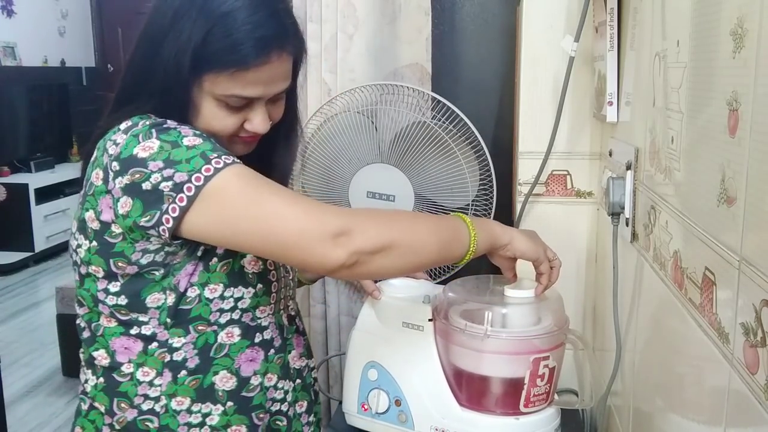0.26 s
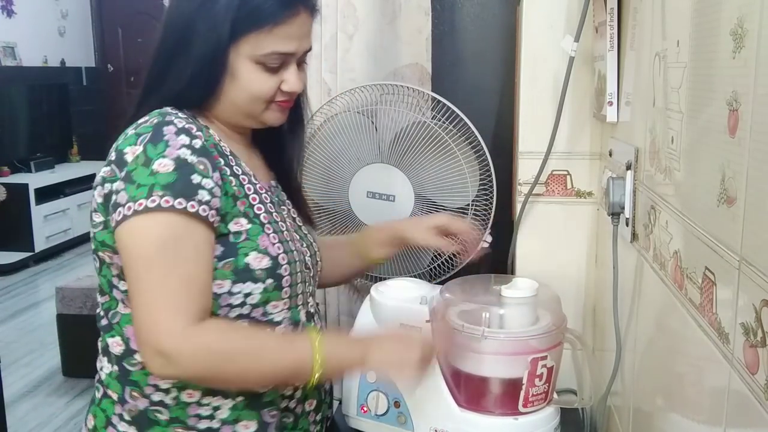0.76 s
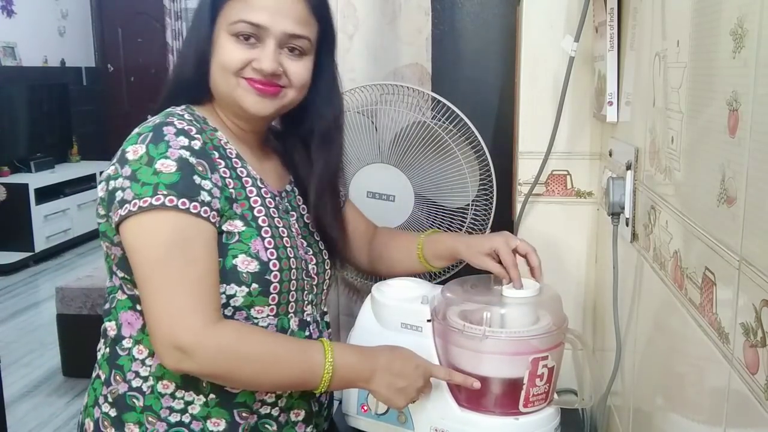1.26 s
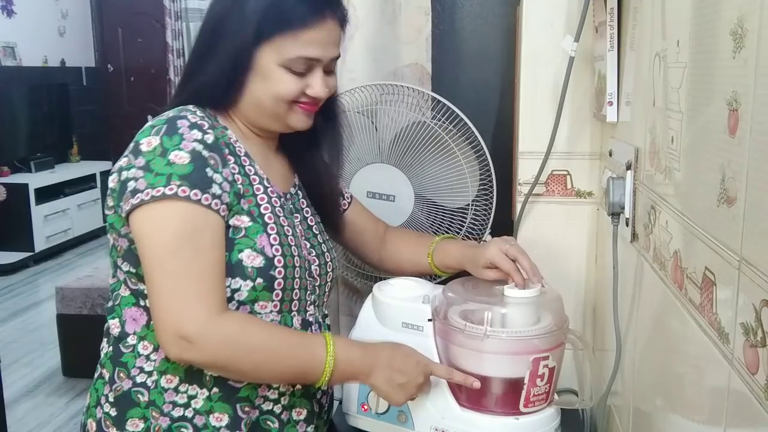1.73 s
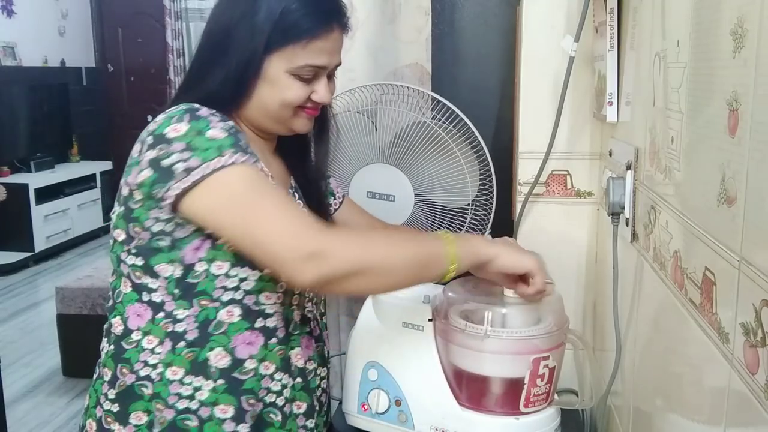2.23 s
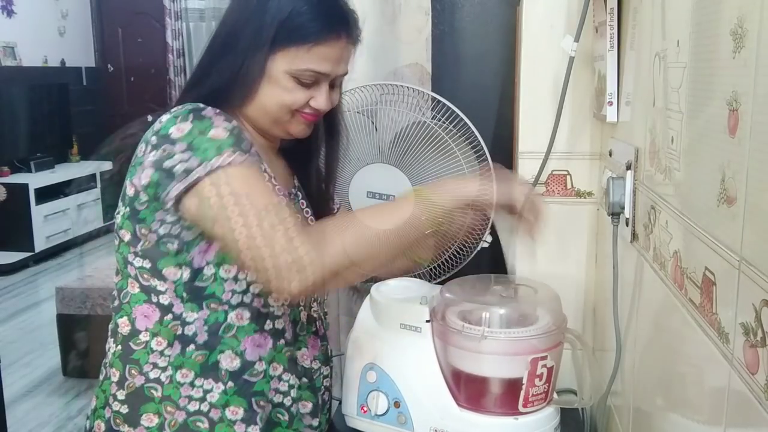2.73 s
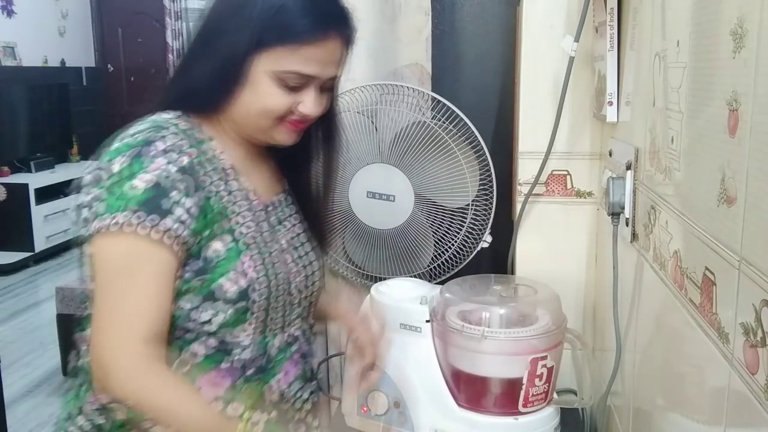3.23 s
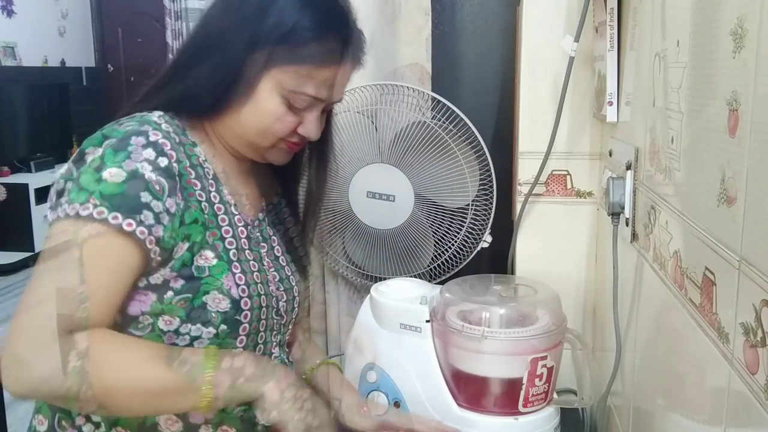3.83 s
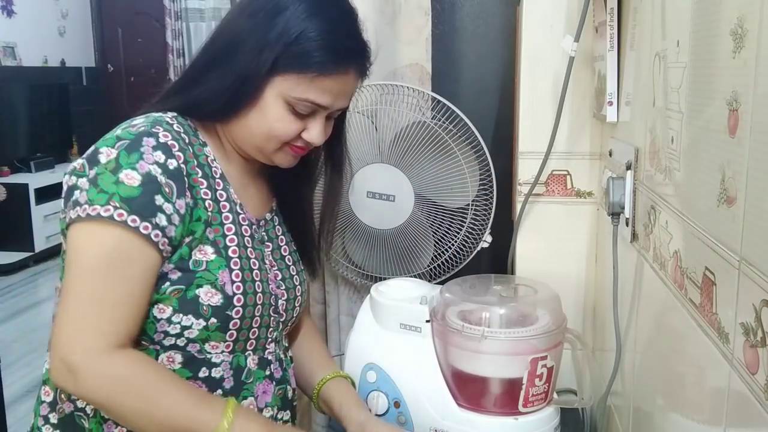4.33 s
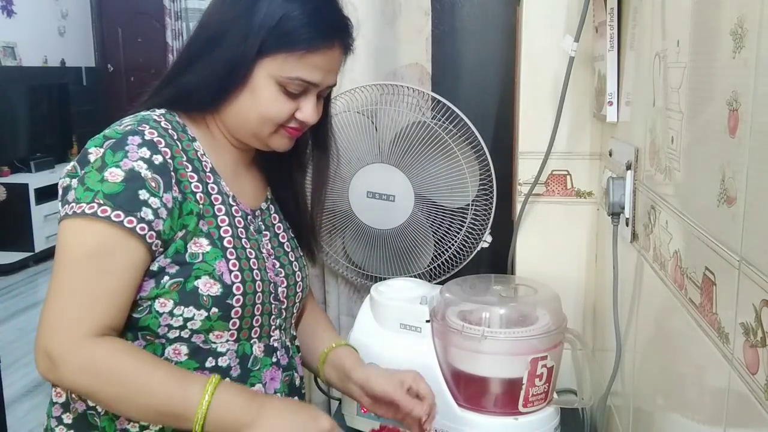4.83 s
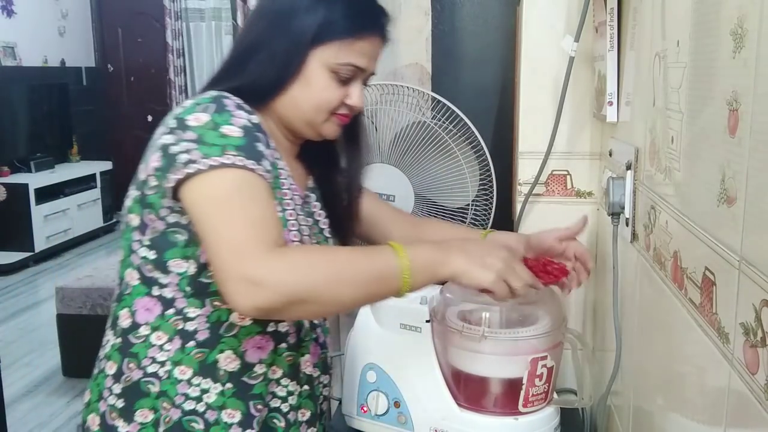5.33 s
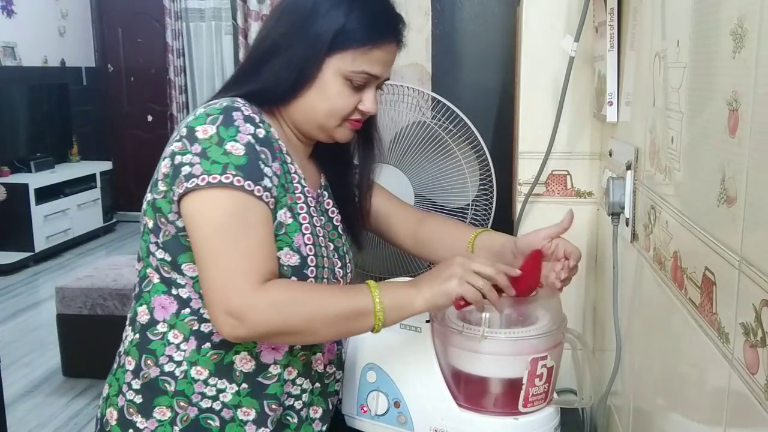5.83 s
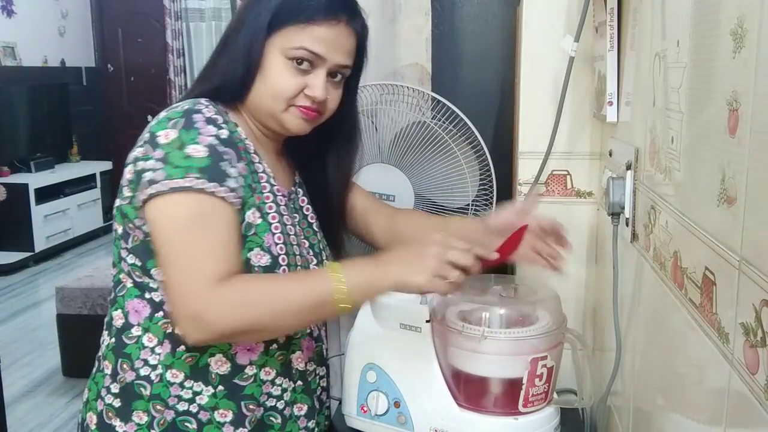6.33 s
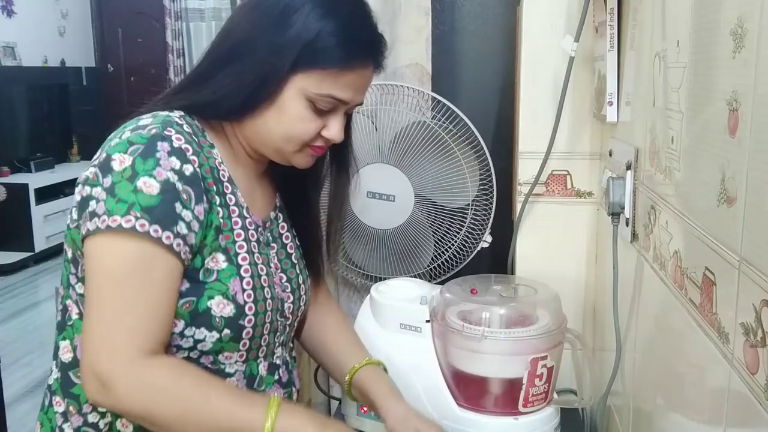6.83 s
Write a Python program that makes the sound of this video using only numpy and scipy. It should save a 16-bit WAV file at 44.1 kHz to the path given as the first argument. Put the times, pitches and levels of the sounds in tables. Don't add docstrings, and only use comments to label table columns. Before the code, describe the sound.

A juicer motor, already switched off, coasts down from 0 to about 1.15 s: a rough gear whine with airy, rattling noise falls steadily in pitch and stops. A light lid contact lands at 1.1 s, then soft ticks and brushes until 2.5 s over low house hum, while a faint hoarse bird whistles outside from 1.4 to 3.4 s. Firm thumps and a hard rap come at 2.65-2.75 s, then a palm slide near 3.1 s. At 3.4 s the background cuts to a quieter one with a bright clink. At 3.57 s hard plastic drops with a very loud chattering crack, landing again softly at 3.75 s. Clinks at 4.25 s, a set-down at 4.54 s, small parts rattling at 4.7-4.85 s. A faint metallic touch at 5.4 s, a knock, then a spatula scrape 5.6-6.05 s, three bowl taps 6.18-6.34 s, a knock at 6.6 s and two clacks at 6.9 s.

```python
import sys
import numpy as np
from scipy import signal
from scipy.fft import rfft, irfft, next_fast_len
from scipy.io import wavfile
from scipy.ndimage import uniform_filter1d, map_coordinates

SR = 44100
rng = np.random.default_rng(int(sys.argv[2]) if len(sys.argv) > 2 else 0)


def elevation(decibels):
    levels = np.asarray(decibels, float)
    return 10 ** (levels / 20)


def generate_wav(sig):
    pcm = np.round(np.clip(np.atleast_2d(sig).T, -1, 1) * 32767).astype(np.int16)
    wavfile.write(sys.argv[1], SR, pcm)


N = 311346
TIME = np.arange(N) / SR
CHANGE_S = 3.408
HALVES = np.array([[.5], [-.5]])


def unit(x):
    return x / np.sqrt(np.mean(x ** 2) + 1e-20)


def along(points, hz):
    f, v = np.transpose(points)
    return np.interp(np.log(hz + 1), np.log(f + 1), v)


def curves(rows):
    s, *columns = np.transpose(rows)
    return [np.interp(TIME, s, column) for column in columns]


def during(start, end, fade):
    return np.clip(np.minimum(TIME - start, end - TIME) / fade + .5, 0, 1)


def wobble(rate):
    knots = rng.standard_normal(int(N * rate / SR) + 4)
    return map_coordinates(knots, [TIME * rate])


def filtered(x, response):
    m = next_fast_len(N + SR // 2)
    return irfft(rfft(x, m) * response(np.fft.rfftfreq(m, 1 / SR)), m)[..., :N]


def resonances(modes, f):
    total = 0
    for k, (centre, width, db) in enumerate(modes):
        damping = 1j * f * width
        total = total + (-1) ** k * elevation(db) * damping / (centre * centre - f * f + damping)
    return total


# f/Hz, left-right likeness
LIKENESS = [(60, .995), (130, .995), (290, .94), (640, .55), (1410, .2), (3100, .05), (15000, 0)]


def rush(gain):
    def mid_side(hz):
        turn = np.arccos(np.clip(along(LIKENESS, hz), -1, 1)) / 2
        return gain(hz) * [np.cos(turn), np.sin(turn)]
    mid, side = filtered(rng.standard_normal((2, N)), mid_side)
    return unit(np.array([mid + side, mid - side]))


def shaped(spectrum):
    return rush(lambda hz: elevation(along(spectrum, hz)))


def glide(rows, blur, spread, rate):
    hz, db = curves(rows)
    turn = 2 * np.pi * np.cumsum(hz) / SR + blur * np.minimum(hz / 1000, 1) * wobble(rate)
    gate = during(rows[0][0], rows[-1][0], 0.025)
    return np.sqrt(2) * elevation(db) * gate * np.sin(turn + spread * np.array([wobble(25), wobble(19)]))


def echoed(x, wet_db, t60):
    t = np.arange(SR // 2) / SR
    tail = elevation(-60 * t / t60) * rng.standard_normal((2, len(t)))
    tail = tail / np.linalg.norm(tail[0])
    return x + elevation(wet_db) * signal.fftconvolve(x, tail, axes=1)[:, :N]


def contacts(rows, body, t60, pan_db, broad_db, crack_db, rise, hold, top_hz=5500, blow=9):
    t = np.arange(SR // 2) / SR
    drive = np.zeros((3, 2, N + len(t)))
    fade_db = -60 * t / max(t60, .03) - 3 * (t / hold) ** 3
    shape = elevation(crack_db - 60 * t / 0.011) + (1 - np.exp(-t / rise)) * elevation(fade_db)
    for s, db, thud_db, fizz_db in rows:
        walls = shape * rng.standard_normal((3, len(t)))
        walls[0, 0] = blow * elevation(crack_db)
        for k, (level, alike) in enumerate([(thud_db, .98), (0, .25), (fizz_db, 0)]):
            pair = np.sqrt(alike) * walls[0] + np.sqrt(1 - alike) * walls[1:]
            drive[k, :, round(s * SR):][:, :len(t)] += elevation(db + level + HALVES * pan_db) * pair

    def low(f, hz):
        return 1 / (1 + 1j * f / hz) ** 2

    def high(f, hz):
        return (1j * f / hz) ** 2 * low(f, hz)

    bands = [lambda f: high(f, 170) ** 2 * low(f, 1200),
             lambda f: high(f, 800) * low(f, top_hz) ** 2,
             lambda f: high(f, 3500) ** 2 * low(f, 14000)]
    grid = np.linspace(1, 15500, num=4000)
    sound = 0
    for part, band in zip(drive, bands):
        colour = lambda f: band(f) * (resonances(body, f) + elevation(broad_db))
        power = np.mean(abs(colour(grid)) ** 2) * 2 * grid[-1] / SR
        sound = sound + filtered(part[:, :N], colour) / np.sqrt(power)
    return sound


def same(rows, thud_db, fizz_db):
    return [(s, db, thud_db, fizz_db) for s, db in rows]


MESH_HZ, STOP_S = 1280, 1.15


def coasting(t):
    return np.clip(1 - (1140 - 115 * np.minimum(t, 2)) * t / MESH_HZ, .05, 1)


RUN = np.linspace(0, STOP_S - .09, num=300)
MESH = coasting(RUN) * MESH_HZ

# f/Hz, width/Hz, level/dB
HOUSING_MODES = [(292.2, 15, 4), (383.8, 8.5, 7.5), (202.7, 41, -12.5), (506, 24, -7.5)]
# f/Hz, width/Hz, level/dB
BEARING_MODES = [(2430, 87, 3.5), (2400, 530, -6), (7190, 350, -12.5)]
# f/Hz, level/dB per Hz
RATTLE_SPECTRUM = [(59, -49.5), (100, -23), (369, -5), (569, -21), (682, -13), (816, -15), (906, -24.5),
                   (1010, -19.5), (1830, -17.5), (2440, -16), (3600, -24.5), (4680, -91), (7920, -120)]
# f/Hz, level/dB per Hz
AIR_SPECTRUM = [(1650, -15.5), (2800, -15), (3740, -3), (4820, -2), (5650, -4), (6210, -3.5), (9800, -6),
                (11200, -2), (14800, -14), (15800, -50)]
# level/dB at the start, power of speed
NOISE_LAYERS = [
    (-29, 0.21),
    (-22.5, 1.08),
    (-41.5, 0.025),
    (-27, 1.48),
]


def running_noise():
    speed_db = 20 * np.log10(coasting(TIME))
    housing_db, rattle_db, squeal_db, air_db = [db + power * speed_db for db, power in NOISE_LAYERS]
    shake = elevation(2 * wobble(16) + 1.5 * wobble(40))
    drum = rush(lambda f: resonances(HOUSING_MODES, f) * f ** 2 / (f ** 2 + 150 ** 2))
    drum = elevation(housing_db) * shake * drum
    rub = elevation(squeal_db + 1.5 + 1.4 * wobble(44)) * rush(lambda f: resonances(BEARING_MODES, f))
    rattle = elevation(rattle_db - 4 + 1.8 * wobble(50)) * shaped(RATTLE_SPECTRUM)
    air = elevation(air_db + 1.0 * wobble(34)) * shaped(AIR_SPECTRUM)
    return during(-1, STOP_S, 0.24) ** 1.5 * (drum + rub + rattle + air)


# f/Hz, width/Hz, level/dB
PANEL_MODES = [(1223, 90, 13), (1099.5, 22, 26.5), (937, 130, 15), (802, 43, 19), (706, 74, 11),
               (544, 35, 14), (512.6, 79, 19.5), (353, 43, 17.4), (297, 87, 15), (226.8, 37, 13)]


def gear_whine():
    uneven = elevation(2.5 * wobble(150) + 2 * wobble(30))
    whine = np.transpose([RUN, MESH, -45.5 + 0 * RUN])
    whine = uneven * glide(whine, blur=1.0, spread=0.25, rate=150)

    def panels(f):
        return sum(resonances([panel], f) ** 2 / elevation(panel[2]) for panel in PANEL_MODES) + 1.6
    return filtered(whine, panels)


# multiple of the mesh, level/dB
UNBALANCED = [(.28, -29), (.41, -34.5), (.64, -37.5)]


def shaft_shake():
    slow = 0
    for k, db in UNBALANCED:
        tone = glide(np.transpose([RUN, k * MESH, db + 0 * RUN]), blur=1.7, spread=0.063, rate=44)
        slow = slow + elevation(3.0 * wobble(13.38)) * tone
    return filtered(slow, lambda f: resonances(HOUSING_MODES, f))


def cooling_blades():
    fan = 1.73 * MESH
    choked = np.transpose([RUN, fan, -29 - 0.17 * np.maximum(1464 - fan, 0)])
    return elevation(-7.5 + 2 * wobble(25)) * glide(choked, blur=1.2, spread=0.7, rate=120)


# multiple of the mesh, level/dB at the start
SHAFT_ORDERS = [(.66, -43.5), (.83, -43), (1.17, -40), (1.36, -43), (1.548, -44), (2.0, -42), (2.3, -45),
                (3.5, -47)]


def shaft_rasp():
    rasp = 0
    for k, db in SHAFT_ORDERS:
        falling = np.transpose([RUN, k * MESH, db + 30 * np.log10(MESH / MESH_HZ)])
        rasp = rasp + elevation(1.6 * wobble(40)) * glide(falling, blur=1.25, spread=0.94, rate=120)
    return rasp


# f/Hz, left over right level/dB
JUICER_BALANCE = [(60, 1.5), (110, 1.5), (200, -1.5), (380, -2.5), (700, 3), (1290, 0), (2380, -0.5),
                  (4400, 1.5), (8120, -1), (15000, 5.5)]


def motor():
    tones = gear_whine() + shaft_shake() + cooling_blades() + shaft_rasp()
    whole = running_noise() + echoed(tones, wet_db=-10.0, t60=0.2)
    return filtered(whole, lambda f: elevation(along(JUICER_BALANCE, f) * HALVES))


# quiet level/dB, gain/dB when the suppression opens
HOUSE_LEVELS = [
    [(-57, 5), (-62.5, -24.5), (-61, 6.5)],
    [(-76, 13), (-70, 5), (-92, 22.5)],
]
# f/Hz, level/dB per Hz
HUM_SPECTRA = [
    [(12, -55.5), (20, -23.5), (145, 2.5), (241, -3.5), (362, 1), (441, -13.5), (653, -6.5), (1000, -22), (1300, -34), (2200, -120)],
    [(12, -60), (20, -26.5), (147, -12), (345, -1), (487, -12.5), (622, -5), (1000, -41), (1300, -54), (2200, -120)],
]
# f/Hz, level/dB per Hz
MURMUR_SPECTRA = [
    [(470, 5.5), (800, 3), (2110, 0.5), (2870, -56), (3230, -32.5), (3420, -25), (4040, -31.5), (4500, -46), (5850, -93.5), (9900, -120)],
    [(470, -45.5), (800, -5.5), (1020, -30.5), (1050, -20.5), (1360, -6), (1610, -12), (2220, -19.5), (2600, -12.5), (2920, -23), (4500, -47), (5850, -63.5), (9900, -120)],
]
# f/Hz, level/dB per Hz
HISS_SPECTRA = [
    [(2350, -35), (4000, 3.5), (4810, -16), (5650, -10), (6120, -6), (7310, -1), (11900, 14.5), (15800, -11)],
    [(2350, -68), (4000, -38.5), (4460, -3.5), (5030, -5), (6830, -7), (15800, 6)],
]
# f/Hz, level/dB
ELECTRIC_TONES = [
    (3150, -74),
    (6300, -84),
]


def room(busy):
    opens_db, open_db, release_s = -53.5, -33, 0.27
    keep = np.exp(-1 / (release_s * SR / 4))
    heard = signal.lfilter([1 - keep], [1, -keep], np.mean(busy ** 2, axis=0))
    heard_db = 10 * np.log10(heard + 1e-12)
    opening = uniform_filter1d(np.clip((heard_db - opens_db) / (open_db - opens_db), 0, 1), size=4410)
    settle_db = -3.5 * (TIME - 2.3) * (TIME < CHANGE_S)
    gates = [TIME < CHANGE_S, TIME >= CHANGE_S]
    sound = 0
    for layers, gate, (hz, tone_db), *colours in zip(HOUSE_LEVELS, gates, ELECTRIC_TONES, HUM_SPECTRA,
                                                     MURMUR_SPECTRA, HISS_SPECTRA):
        for (db, lift_db), colour, sinks in zip(layers, colours, [1, 0, 0]):
            level_db = db + lift_db * opening + sinks * settle_db
            sound = sound + gate * elevation(level_db + 1.8 * wobble(8) + 2.2 * wobble(30)) * shaped(colour)
        tone = np.sin(2 * np.pi * hz * TIME + 1.5 * np.array([wobble(150), wobble(150)]))
        sound = sound + gate * elevation(tone_db + 3 * wobble(25)) * tone
    return sound


# t/s, clack peak level/dB, thud level/dB and fizz level/dB over the clack
LID_CONTACTS = [(1.1139, -37, -7.5, -51), (1.2196, -57, -31, -3), (1.5219, -48.5, -46, 7.5),
                (1.8472, -63, -36, 4), (1.9041, -48, -0.5, 6.5), (2.085, -58, -11, 8),
                (2.2887, -53, -24, 10.5), (2.3872, -65.5, 17, 18.5), (2.4904, -38.5, -2.5, 15.5),
                (2.5492, -37.5, -32, -11.5), (2.7574, -48, 7, 14.5), (2.8496, -49, -47, 13.5)]
# f/Hz, width/Hz, level/dB
LID_MODES = [(226, 140, 18.5), (757, 65, 3.5), (1466, 67, -52), (4140, 400, 8), (11700, 4800, 9)]


def lid():
    return contacts(LID_CONTACTS, LID_MODES, t60=0.42, pan_db=2.0, broad_db=-3.0, crack_db=1.5,
                    rise=0.013, hold=0.18)


# t/s, clack peak level/dB, thud level/dB and fizz level/dB over the clack
BRUSH_CONTACTS = [(1.3, -52, 5, -16), (2.6893, -39.5, -8, 12.5), (4.275, -62, 13, -25),
                  (4.3328, -61.5, 13, -23), (4.4319, -60, 16, 11), (4.487, -51, 1, -14),
                  (4.9082, -49, -22, -31.5), (5.0496, -76.5, 0, -14.5), (5.1967, -45.5, -22.5, -12),
                  (5.346, -45, -26, -16.5), (5.429, -67, 0, -30), (5.5301, -46, -11.5, -19),
                  (6.1579, -51.5, 6.5, -33.5), (6.41, -63.5, 12, -22), (6.4639, -47.5, -5.5, 7),
                  (6.4898, -58, -19, 18), (6.8705, -79, 17, -38), (6.976, -43.5, -8, 1.5)]
# f/Hz, width/Hz, level/dB
CLOTH_MODES = [(448, 330, -26), (1320, 110, -6.5), (3890, 1300, -5.5)]


def brushes():
    return contacts(BRUSH_CONTACTS, CLOTH_MODES, t60=0.26, pan_db=2.0, broad_db=-9.5, crack_db=-15.5,
                    rise=0.028, hold=0.093, top_hz=5000)


# t/s, length/s, start f/Hz, top f/Hz, level/dB
BIRD_NOTES = [(1.43, .14, 1900, 2170, -70), (1.55, .17, 2160, 2210, -71), (1.7, .19, 2220, 2260, -64),
              (1.76, .14, 2190, 1930, -68), (2.06, .24, 1620, 1760, -71), (2.34, .14, 1860, 2130, -68),
              (2.87, .11, 1980, 2080, -72), (2.965, .13, 2110, 2255, -61), (3.13, .12, 2290, 2490, -62),
              (3.22, .22, 2490, 2510, -56), (3.31, .11, 2440, 2330, -63)]


def bird():
    u, calls = np.linspace(0, 1, num=40), 0
    for s, length, start_hz, top_hz, db in BIRD_NOTES:
        pitch = start_hz + (top_hz - start_hz) * np.sin(1.22 * u * np.pi / 2)
        level_db = db - 5 * (2 * u - 1) ** 4
        call = glide(np.transpose([s + length * u, pitch, level_db]), blur=.65, spread=.5, rate=220)
        calls = calls + elevation(1.3 * wobble(20) + 1.5 * wobble(60)) * call
    return (TIME < CHANGE_S) * echoed(calls, wet_db=-4, t60=0.3)


# t/s, clack peak level/dB, thud level/dB and fizz level/dB over the clack
RAP_CONTACTS = [
    (1.6945, -71, 25, -16),
    (2.7195, -30.5, -28, -17),
    (2.727, -42, -9, 13),
]
# t/s, clack peak level/dB, thud level/dB and fizz level/dB over the clack
THUMP_CONTACTS = [
    (2.291, -59.5, 20, -35.5),
    (2.646, -34.5, 2.2, -36),
    (2.666, -34.5, 6.9, -0.5),
    (2.9758, -64.5, 18, -33),
]
# f/Hz, width/Hz, level/dB
THUMP_MODES = [(217, 55, 21), (752, 97, 5), (1420, 100, -23)]


def raps_and_thumps():
    raps = contacts(RAP_CONTACTS, THUMP_MODES[:2] + [(1370, 61, 0)], t60=0.18, pan_db=-2.0, broad_db=-16,
                    crack_db=-1.5, rise=0.0062, hold=0.13, top_hz=2960, blow=31)
    thumps = contacts(THUMP_CONTACTS, THUMP_MODES, t60=0.14, pan_db=-2.5, broad_db=-8.0, crack_db=-14,
                      rise=0.015, hold=0.12)
    return raps + thumps


# t/s, level/dB
JOLTS = [
    (2.489, -62),
    (3.57, -60),
    (4.538, -61),
    (5.559, -61),
    (6.179, -83),
    (6.257, -60),
    (6.338, -60),
]


def bumps():
    t, pushes = np.arange(SR // 8) / SR / 0.0067, np.zeros(N + SR)
    for s, db in JOLTS:
        pushes[round(s * SR):][:len(t)] += elevation(db + 11.5) * t * np.exp(1 - t)
    return pushes[:N]


# t/s, clack peak level/dB, thud level/dB and fizz level/dB over the clack
SLIDE_CONTACTS = [
    (3.058, -45.5, -19, 14),
    (3.25, -51, -4, 8.7),
    (4.33, -62.5, -2, 21.2),
    (6.615, -62, -11, 0.78),
    (6.776, -69, -3, 8.3),
]
# f/Hz, width/Hz, level/dB
PALM_MODES = [(4000, 1300, -3.5), (11600, 2700, 15.5)]


def slides():
    return contacts(SLIDE_CONTACTS, PALM_MODES, t60=1.0, pan_db=4.5, broad_db=-31.0, crack_db=-46,
                    rise=0.09, hold=0.095)


# t/s, clack peak level/dB, thud level/dB and fizz level/dB over the clack
CLINK_CONTACTS = [
    (3.436, -38.5, -39, -9.5),
    (4.2327, -50.5, 6.5, -9.5),
    (4.3346, -48, -12, -6),
]
# f/Hz, width/Hz, level/dB
CLINK_MODES = [
    [(1510, 54, -1.5), (4700, 500, -16.5)],
    [(2200, 110, -8), (3370, 170, -12.5)],
    [(3200, 99, -3), (1410, 310, -4.5)],
]


def clinks():
    return sum(contacts([row], body, t60=0.15, pan_db=1.5, broad_db=-28.5, crack_db=-2.5, rise=0.01, hold=0.056)
               for row, body in zip(CLINK_CONTACTS, CLINK_MODES))


# t/s, clack peak level/dB, thud level/dB and fizz level/dB over the clack
PUSHER_CONTACTS = [
    (3.5652, -8, -16.5, -15),
    (3.5735, -13.5, -13, -18),
    (3.5822, -4.5, -16, -10),
    (3.5868, -10, -13.5, -14),
    (3.5925, -10.5, -18, -12),
    (3.6005, -19.5, -13.5, -19),
    (3.614, -22.5, -16, -10.5),
    (3.627, -23.5, -13, -7.5),
]
# f/Hz, width/Hz, level/dB
PUSHER_MODES = [(506, 85, -2), (890, 44, 1.5), (1434, 90, 1.5), (1600, 200, 0.5), (1835, 42, 3.5),
                (2480, 180, -10.5), (3100, 600, -8.5), (3150, 160, -2.5), (3880, 1200, -17),
                (4970, 200, -12.5)]
# t/s, clack peak level/dB, thud level/dB and fizz level/dB over the clack
REBOUND_CONTACTS = [
    (3.7385, -37, -10, -3),
    (3.7537, -38.5, 0, -7.5),
    (3.768, -46.5, -15, 2),
]
# f/Hz, width/Hz, level/dB
REBOUND_MODES = [(453, 100, 1), (918, 36, 8.5), (1440, 330, -15), (2370, 100, 2.5), (3270, 320, 1),
                 (5700, 900, 0)]


def pusher():
    fall = contacts(PUSHER_CONTACTS, PUSHER_MODES, t60=0.07, pan_db=0.16, broad_db=-11.5, crack_db=-1.0,
                    rise=0.0034, hold=0.17)
    fall = filtered(fall, lambda f: (1j * f / (260 + 1j * f)) ** 2 / (1 + 1j * f / 9000))
    rebound = contacts(REBOUND_CONTACTS, REBOUND_MODES, t60=0.14, pan_db=0.0, broad_db=-16.5, crack_db=0.5,
                       rise=0.0054, hold=0.1)
    return echoed(fall, wet_db=-10, t60=0.28) + rebound


# t/s, clack peak level/dB, thud level/dB and fizz level/dB over the clack
SET_DOWN_CONTACTS = [
    (4.522, -48.5, -5, -14),
    (4.5355, -48, 5, 5.5),
    (4.5385, -38, 7.5, -4),
]
# f/Hz, width/Hz, level/dB
SET_DOWN_MODES = [(428, 79, 2.5), (657, 74, 1.5), (880, 110, -4), (2400, 160, -11), (2980, 400, -25)]


def set_down():
    return contacts(SET_DOWN_CONTACTS, SET_DOWN_MODES, t60=0.19, pan_db=0.1, broad_db=-14, crack_db=-2.1,
                    rise=0.0028, hold=0.23, blow=24)


# t/s, level/dB
TINKLE_CONTACTS = [(4.6872, -49.5), (4.7094, -52.5), (4.73, -50), (4.75, -51), (4.7696, -52.5), (4.79, -68),
                   (4.81, -60.5), (4.8525, -65.5)]
# f/Hz, width/Hz, level/dB
TINKLE_MODES = [(437, 122, 5), (1020, 90, 2.5), (1370, 61, -2), (2930, 290, 7.5), (680, 85, -18),
                (3800, 190, -10.5), (5160, 290, -2.5)]
# t/s, level/dB
TICK_CONTACTS = [(4.6872, -43), (4.7065, -48), (4.7185, -49), (4.7317, -47), (4.7496, -48), (4.7696, -44),
                 (4.7855, -51), (4.8075, -52), (4.8534, -46)]
# f/Hz, width/Hz, level/dB
TICK_MODES = [(2870, 170, 0), (2450, 250, -12), (5200, 500, -26)]


def tinkle():
    ringing = contacts(same(TINKLE_CONTACTS, thud_db=1.5, fizz_db=-19), TINKLE_MODES, t60=0.21, pan_db=1.5,
                       broad_db=-23, crack_db=-16, rise=0.008, hold=0.048)
    ticks = contacts(same(TICK_CONTACTS, thud_db=-30, fizz_db=-25), TICK_MODES, t60=.045, pan_db=1.5,
                     broad_db=-40, crack_db=-5, rise=0.004, hold=0.03, blow=22)
    return ringing + elevation(-3.0) * ticks


# t/s, clack peak level/dB, thud level/dB and fizz level/dB over the clack
SPOON_CONTACT = [
    (5.412, -51, -29, -23),
]
# f/Hz, width/Hz, level/dB
SPOON_MODES = [(1130, 14, -8), (1494, 13, -0.5), (1825, 15, -14), (2280, 15, -12), (2585, 20, -9)]


def spoon():
    return contacts(SPOON_CONTACT, SPOON_MODES, t60=0.48, pan_db=6.5, broad_db=-45, crack_db=4,
                    rise=0.012, hold=0.08)


# t/s, clack peak level/dB, thud level/dB and fizz level/dB over the clack
KNOCK_CONTACTS = [
    (5.5555, -45, 7, -4.5),
    (6.617, -56, -6, -13.5),
    (6.6262, -43.5, 3, -20),
]
# f/Hz, width/Hz, level/dB
COUNTER_MODES = [(438, 70, 3.5), (673, 44, 4), (830, 550, -9), (2630, 43, -12.5), (3200, 2500, -11),
                 (5160, 25, -42)]


def knocks():
    return contacts(KNOCK_CONTACTS, COUNTER_MODES, t60=0.17, pan_db=0.5, broad_db=-24.0, crack_db=-2.0,
                    rise=0.0045, hold=0.13, top_hz=4400, blow=10.4)


# t/s, level/dB
STROKE_CONTACTS = [(5.607, -55), (5.62, -56), (5.639, -36), (5.6585, -28), (5.6782, -29.5), (5.6965, -25),
                   (5.706, -30.5), (5.725, -28), (5.742, -38)]
# f/Hz, width/Hz, level/dB
SPATULA_MODES = [(457, 220, -13.5), (864, 46, -1.5), (1087, 62, -5.5), (1910, 25, 12.5), (2270, 72, 0),
                 (3540, 280, -3.5)]
# t/s, level/dB
SNAP_CONTACTS = [(5.6402, -38.5), (5.6596, -33.5), (5.8602, -49), (5.9729, -44), (5.9844, -40.5),
                 (6.016, -46.5)]
# f/Hz, width/Hz, level/dB
SNAP_MODES = [(2370, 170, 1), (3400, 400, 3.5), (2880, 500, -3)]
# t/s, level/dB
FLICK_CONTACTS = [(5.762, -38.5), (5.778, -34.5), (5.7922, -32), (5.8088, -34.5), (5.825, -39),
                  (5.84, -38.5), (5.8585, -43), (5.878, -40), (5.9, -43), (5.93, -51), (5.9525, -45),
                  (5.9694, -44), (5.9836, -40.5), (6.0, -49), (6.02, -49.5), (6.0457, -50.5)]
# f/Hz, width/Hz, level/dB
FLICK_MODES = [(457, 320, 2.5), (1170, 220, 2), (1900, 230, 6.5), (2320, 170, 8.5), (3080, 1300, -7)]


def spatula():
    strokes = contacts(same(STROKE_CONTACTS, thud_db=-6.5, fizz_db=-17.5), SPATULA_MODES, t60=0.11,
                       pan_db=-0.3, broad_db=-16.0, crack_db=-5.0, rise=0.0015, hold=0.11)
    snaps = contacts(same(SNAP_CONTACTS, thud_db=-20, fizz_db=-22), SNAP_MODES, t60=0.11, pan_db=-3.0,
                     broad_db=-25, crack_db=-1, rise=0.005, hold=0.05, blow=12)
    flicks = contacts(same(FLICK_CONTACTS, thud_db=-3.5, fizz_db=-22.0), FLICK_MODES, t60=0.12, pan_db=-1.0,
                      broad_db=-15.5, crack_db=-7.5, rise=0.0033, hold=0.11)
    return strokes + snaps + flicks


# t/s, clack peak level/dB, thud level/dB and fizz level/dB over the clack
TAP_CONTACTS = [
    (6.1846, -43.5, 0.3, -9),
    (6.2612, -36.5, -0.73, -4),
    (6.3375, -36.5, 0.63, -4),
]
# f/Hz, width/Hz, level/dB
BOWL_MODES = [(309, 46, 7), (768, 46, 10.5), (970, 130, -1), (1520, 490, -4.5), (2780, 960, -14.5)]


def taps():
    return contacts(TAP_CONTACTS, BOWL_MODES, t60=0.18, pan_db=-0.1, broad_db=-15, crack_db=2.5,
                    rise=0.0048, hold=0.18, blow=30)


# t/s, clack peak level/dB, thud level/dB and fizz level/dB over the clack
CLACK_CONTACTS = [
    (6.871, -62, 13, -22),
    (6.8874, -37.5, 1, -27),
    (6.9164, -38, 0.5, -5.5),
    (6.981, -54.5, 7, -2),
]
# f/Hz, width/Hz, level/dB
CLACK_MODES = [(454, 61, 7), (860, 220, -1), (1380, 140, -3.5), (2260, 140, -3), (2720, 200, -10),
               (3310, 390, -8)]


def clacks():
    return contacts(CLACK_CONTACTS, CLACK_MODES, t60=0.14, pan_db=0.1, broad_db=-25, crack_db=0.5,
                    rise=0.006, hold=0.099, top_hz=4170, blow=12.6)


def handling():
    early = lid() + brushes() + raps_and_thumps() + slides()
    dropped = clinks() + pusher() + set_down() + tinkle()
    return early + dropped + spoon() + knocks() + spatula() + taps() + clacks()


def scene():
    near = motor() + handling()
    return near + bumps() + bird() + room(near)


def thinned(x, drop_share, weak, depth_db, jump):
    hz, _, z = signal.stft(x, SR, nperseg=1536, noverlap=1024)
    local = np.sqrt(abs(uniform_filter1d(abs(z) ** 2, size=21, axis=1)))
    band = (32 * np.log(1 + hz / 3000)).astype(int)
    luck = rng.standard_normal((band[-1] + 1, z.shape[2]))
    luck = uniform_filter1d(luck, size=8, axis=1)[band]
    power = np.sum(abs(z[:, hz > 2000]) ** 2, axis=(0, 1))
    loud = power > elevation(-84)
    dropped = luck < np.where(loud, np.quantile(luck, .14), np.quantile(luck, drop_share))
    lost = dropped | (abs(z) < weak * local)
    calm = np.maximum(power, np.roll(power, -1)) < jump * np.roll(power, 2)
    start_hz = np.where(power > elevation(-104), 2600, 1300)
    treble = np.clip((hz[:, None] - start_hz) / 1500, 0, 1)
    kept = z * elevation(depth_db * treble * lost * calm) * (hz[:, None] < 15450)
    return signal.istft(kept, SR, nperseg=1536, noverlap=1024)[1][:, :N]


def roll_off(x):
    return signal.sosfilt(signal.butter(12, 16380, fs=SR, output="sos"), x)


def record(dry):
    heard = filtered(dry, lambda f: 1j * f / (70 + 1j * f))
    heard = heard / (1 + abs(heard / .85) ** 4) ** .25
    mix = thinned(heard, drop_share=.25, weak=1.2, depth_db=-36, jump=8)
    return roll_off(mix)


dry = scene()
out = record(dry)
generate_wav(out)
```